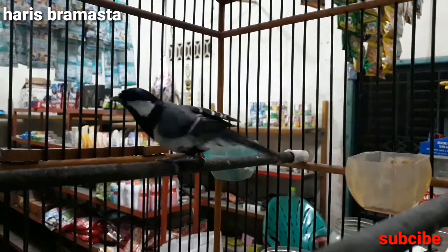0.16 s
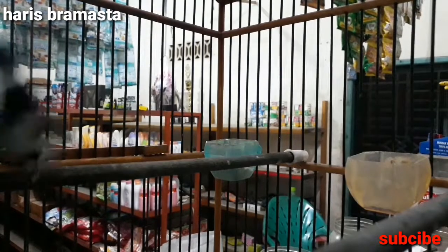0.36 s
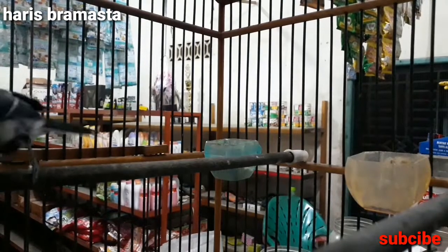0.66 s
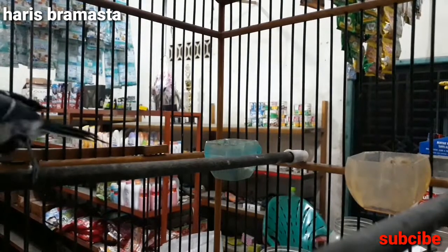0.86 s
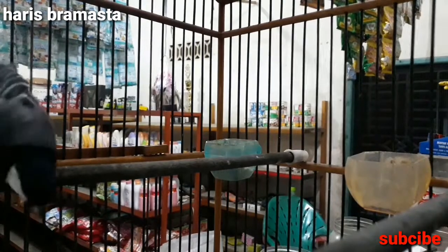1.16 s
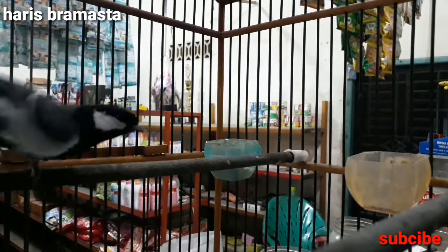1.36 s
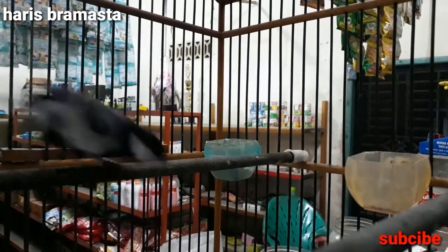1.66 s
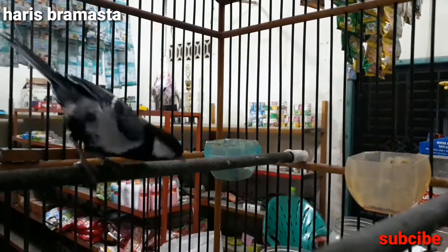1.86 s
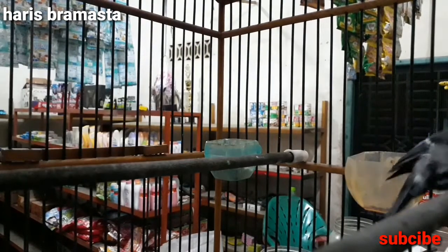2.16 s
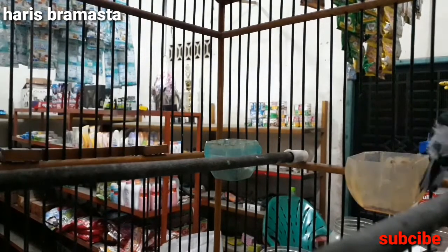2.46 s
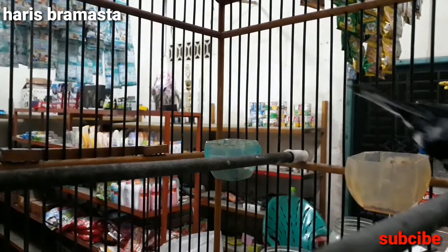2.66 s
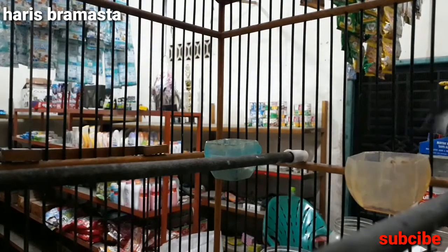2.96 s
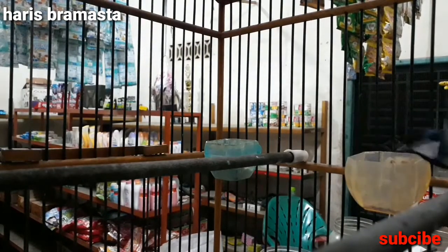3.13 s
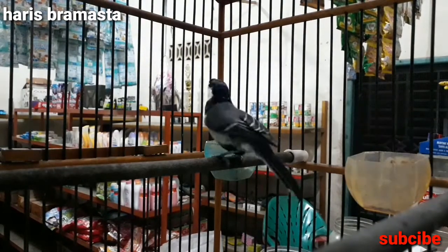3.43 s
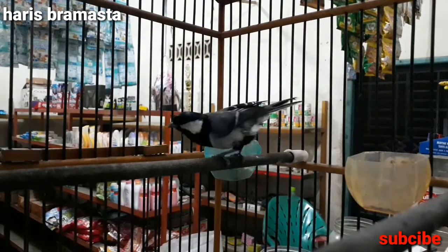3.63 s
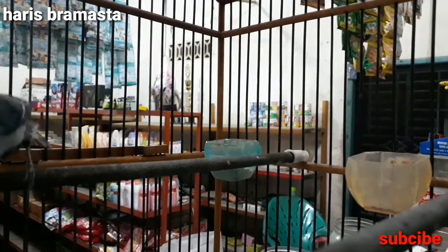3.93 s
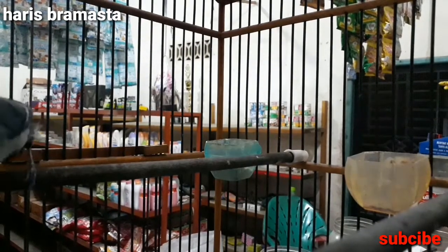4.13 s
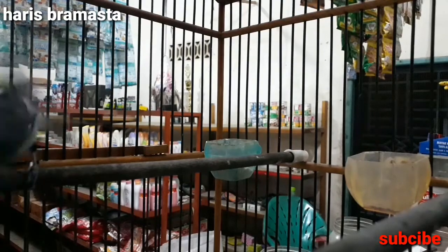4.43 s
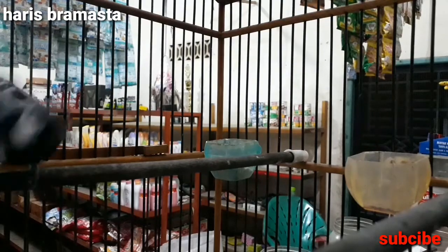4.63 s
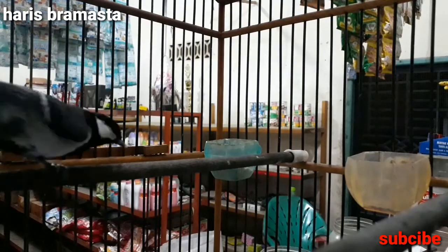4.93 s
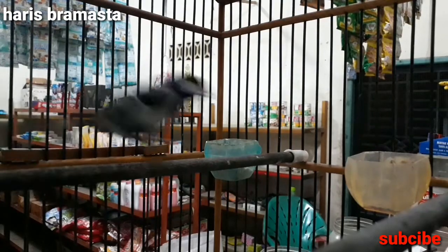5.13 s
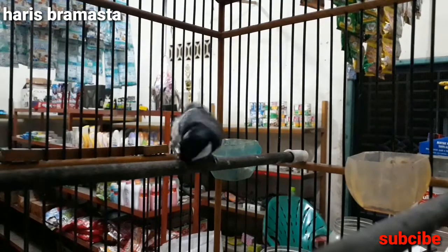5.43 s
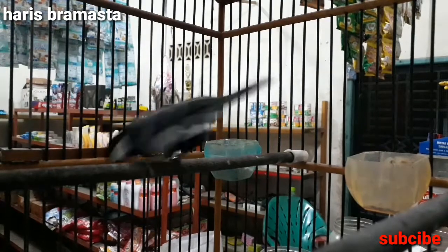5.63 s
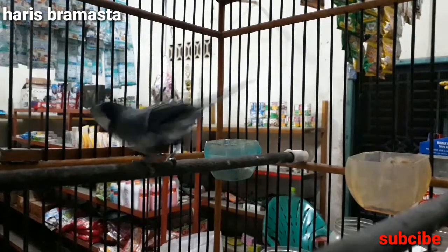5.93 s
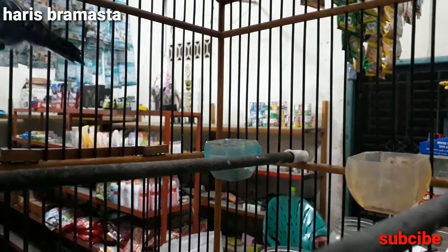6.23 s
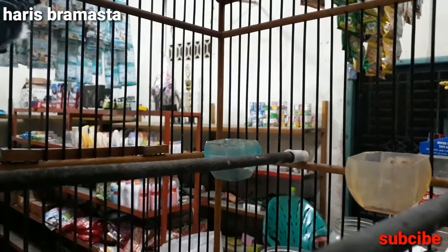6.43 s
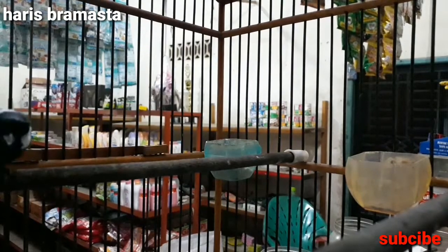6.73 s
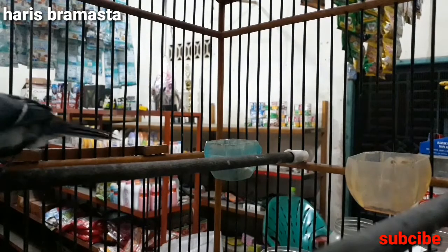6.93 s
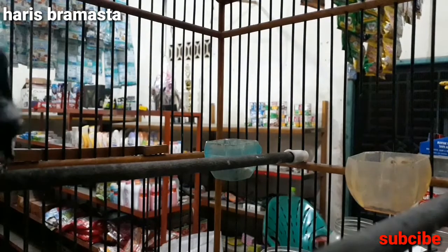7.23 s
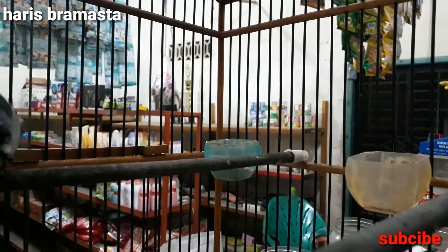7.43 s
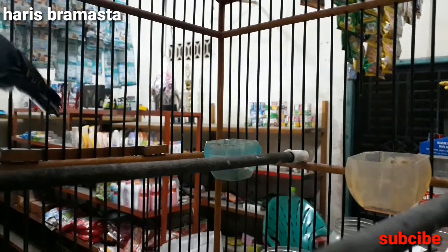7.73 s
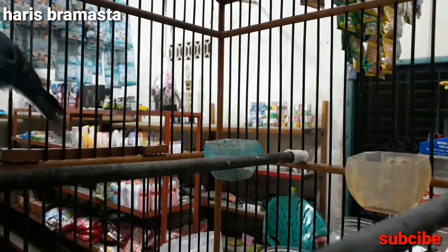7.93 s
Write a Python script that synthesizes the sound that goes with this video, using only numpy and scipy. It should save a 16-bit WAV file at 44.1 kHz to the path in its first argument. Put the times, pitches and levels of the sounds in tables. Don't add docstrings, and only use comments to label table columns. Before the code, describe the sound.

Caged birds whistle, seep and trill sharply in an echoing shop, claws knocking a wooden perch, while a vehicle drones nearer outside near the end.

```python
import sys
import numpy as np
from scipy import signal
from scipy.fft import rfft, irfft, next_fast_len
from scipy.io import wavfile
from scipy.ndimage import uniform_filter1d, map_coordinates

SR = 44100
rng = np.random.default_rng(int(sys.argv[2]) if len(sys.argv) > 2 else 0)


def file_out(sig):
    cols = np.atleast_2d(sig).T
    lim = np.clip(cols, -1, 1)
    pcm = np.round(lim * 32767).astype(np.int16)
    wavfile.write(sys.argv[1], SR, pcm)


def voltage_ratio(decibels):
    exponent = np.asarray(decibels, float) / 20
    return 10 ** exponent


N = 356769
TIME = np.arange(N) / SR

SONG_OVERTONES = [3.5, -33, -50, -45]


def unit(x):
    return x / np.sqrt(np.mean(x ** 2) + 1e-20)


def along(points, hz):
    f, v = np.transpose(points)
    return np.interp(np.log(hz + 1), np.log(f + 1), v)


def wobble(rate, count=N):
    knots = rng.standard_normal(int(count * rate / SR) + 4)
    return map_coordinates(knots, [np.arange(count) * rate / SR])


def filtered(x, response):
    m = next_fast_len(N + SR // 2)
    return irfft(rfft(x, m) * response(np.fft.rfftfreq(m, 1 / SR)), m)[:N]


def rush(spectrum, patchy_db):
    z = signal.stft(rng.standard_normal(N), nperseg=512)[2]
    over_frequency = uniform_filter1d(rng.standard_normal(z.shape), size=6, axis=0)
    field = uniform_filter1d(over_frequency, size=14, axis=1)
    patchy = signal.istft(z * voltage_ratio(patchy_db * unit(field)), nperseg=512)[1][:N]
    return unit(filtered(patchy, lambda hz: voltage_ratio(along(spectrum, hz))))


def add(track, rows, overtones_db, jitter, shimmer_db, fade):
    s, hz, db = np.transpose(rows)
    at = np.arange(max(round(s[0] * SR), 0), min(round(s[-1] * SR), N))
    t = at / SR
    pitch = np.interp(t, s, hz) * (1 + jitter * wobble(150.7, count=len(t)))
    phase = 2 * np.pi * np.cumsum(pitch) / SR
    edge = np.clip(np.minimum(t - s[0], s[-1] - t) / fade, 0, 1)
    tone = sum(voltage_ratio(level) * np.sin(k * phase) * (k * pitch < SR / 2)
               for k, level in enumerate(overtones_db, start=1))
    level_db = np.interp(t, s, db) + shimmer_db * wobble(120, count=len(t))
    track[at] += edge * voltage_ratio(level_db) * tone


def shop(x, liveness=1):
    # (frequency [Hz], time to fall 60 dB [s])
    decay_times = [(500, 0.29), (3000, 0.47), (8000, 0.35), (15000, .2)]
    hz, t, z = signal.stft(rng.standard_normal(SR * 3 // 4), SR, nperseg=256)
    decay_db = -60 * t / (liveness * along(decay_times, hz)[:, None])
    tail = signal.istft(z * voltage_ratio(decay_db), SR, nperseg=256)[1]
    delayed = np.pad(x, (round(.006 * SR), 0))
    return signal.fftconvolve(delayed, tail / np.linalg.norm(tail))[:N]


def orders(rate_hz, levels, flutter_db):
    turn = 2 * np.pi * np.cumsum(rate_hz * (1 + 0.0027 * wobble(2.7))) / SR
    return unit(sum(voltage_ratio(db + flutter_db * wobble(4.6)) * np.sin(k * turn + 0.44 * wobble(3.7))
                    for k, db in levels))


def street():
    # (time [s], firing rate [Hz], engine load [dB], nearness [dB])
    approach = [(0, 58.68, -72, -56), (1.1, 58.93, -64, -56), (1.9, 60.15, -72, -57),
                (2.85, 60.03, -59, -53.5), (3.6, 61, -64.5, -55), (4.4, 61.46, -61, -52),
                (5, 61.02, -63, -49), (5.6, 60.08, -52.5, -46), (6.2, 59.56, -42.5, -43.5),
                (6.85, 55.35, -42.5, -35.5), (7.299, 52.27, -37, -33.5), (7.7, 49.54, -36, -35.5),
                (7.9, 48, -46, -37.5), (8.09, 48.8, -45, -39)]
    firing_orders = [0.5, -5.5, -8.5, -8.5, -18.5, -11.5, -21, -21]
    # (time [s], shaft rate [Hz], level [dB])
    departure = [
        (0, 33.2, -56.5),
        (.6, 33.77, -56),
        (1.5, 35.2, -60.5),
        (1.9, 35.4, -63.5),
    ]
    # (multiple of the shaft rate, level [dB])
    departing_orders = [(2, -11), (4, -1.5), (5, -3), (6, -10), (7, -15.5)]
    # (time [s], pitch [Hz], level [dB])
    gear_whine = [(.15, 365.4, -67), (.35, 356.3, -55), (.65, 348.2, -61), (1, 338.7, -71),
                  (1.3, 314.3, -63.5), (1.701, 308, -65)]
    # (frequency [Hz], density [dB per Hz])
    near_road = [(18, -33), (30, -11), (54, -2.5), (152, -5), (217, -2.5), (263, -5), (434, -3.5),
                 (513, -3.5), (1400, -11.5), (1690, -13), (2050, -16), (3230, -20.5), (9000, -42.5),
                 (11700, -65), (19800, -120)]
    far_street = [(15, -65), (25, -45), (75, -5.5), (117, 1.5), (240, -16.5), (308, -8), (404, -10),
                  (436, -8), (493, -29.5), (602, -18), (1090, -18.5), (1270, -19.5), (2140, -25.5),
                  (3520, -30.5), (9500, -45.5), (12400, -85.5), (20900, -120)]
    tyre_hiss = [(4710, -38.5), (8000, -53), (9620, -6), (10400, 9), (11400, 9), (14900, 8.5), (15600, 9)]

    s, *columns = np.transpose(approach)
    firing_hz, drone_db, wash_db = [np.interp(TIME, s, c) for c in columns]
    drone = orders(firing_hz, enumerate(firing_orders, start=1), flutter_db=1.2)

    s, shaft_hz, db = np.transpose(departure)
    going = voltage_ratio(np.interp(TIME, s, db, right=-120))
    leaving = going * orders(np.interp(TIME, s, shaft_hz), departing_orders, flutter_db=2.5)

    near = np.clip((wash_db + 60.5) / 16, 0, 1)
    road = np.sqrt(near) * rush(near_road, patchy_db=0.5)
    road += np.sqrt(1 - near) * rush(far_street, patchy_db=1.0)
    road_db = wash_db + 1.5 + 0.27 * wobble(7.6)

    whine = np.zeros(N)
    add(whine, gear_whine, [3], jitter=0.0078, shimmer_db=-2.5, fade=0.017)

    closest_db = -33.5
    nearing_hiss = voltage_ratio(-61 + 0.85 * (wash_db - closest_db))
    tyres = np.hypot(nearing_hiss, going * voltage_ratio(-18.5))
    hiss = tyres * voltage_ratio(2.5 + 1.2 * wobble(1.9)) * rush(tyre_hiss, patchy_db=1.5)
    return voltage_ratio(drone_db + 2.0) * drone + leaving + voltage_ratio(road_db) * road + hiss + whine


def whirr():
    # (frequency [Hz], width [Hz], level [dB])
    tread_bands = [(396.4, 18, -8.5), (940, 65, -5.5), (1246, 60, -1), (1694, 64, -0.5)]
    # (time [s], level [dB])
    course = [
        (2.6, -68),
        (3.5, -65.5),
        (4.5, -58),
        (5.4, -60.5),
        (6, -82.5),
    ]
    bands = lambda f: sum(voltage_ratio(db) * 1j * f * w / (c * c - f * f + 1j * f * w) for c, w, db in tread_bands)
    level_db = np.interp(TIME, *np.transpose(course), left=-120, right=-120)
    return voltage_ratio(level_db) * unit(filtered(rng.standard_normal(N), bands))


def ticks():
    # (time [s], peak level [dB])
    snaps = [(1.585, -66), (1.7, -63.5), (2.157, -68.5), (5.982, -55.5)]
    out = np.zeros(N)
    t = np.arange(SR // 50) / SR
    for s, db in snaps:
        bright = np.diff(rng.standard_normal(len(t) + 2), n=2)
        out[round(s * SR):][:len(t)] += voltage_ratio(db - 60 * t / .008) * bright
    return out


def perch():
    # (time [s], peak level [dB], middle mode [dB])
    knocks = [(0.105, -39, -13), (0.413, -45.5, 7), (1.165, -39.5, 3), (1.934, -47.5, -18),
              (2.126, -32, 1.5), (3.892, -41.5, -9)]
    # (frequency [Hz], width [Hz], level [dB])
    rod_modes = [(504, 50, -3), (700, 96, 1), (935, 51, -2.5), (1390, 76, -1.5)]
    out = np.zeros(N)
    t = np.arange(SR // 8) / SR
    for s, db, middle_db in knocks:
        ring = np.zeros(len(t))
        for hz, width, level in rod_modes:
            mode_db = level + (middle_db if 800 < hz < 1100 else 0)
            ring += voltage_ratio(mode_db) * np.exp(-np.pi * width * t) * np.sin(2 * np.pi * hz * t)
        soft_contact = 1 - np.exp(-t / 0.00091)
        out[round(s * SR):][:len(t)] += voltage_ratio(db - 5) * ring * soft_contact
    return out + voltage_ratio(-9) * shop(out)


def glides(calls, attack, release, onset_db, end_db, bend, linger=0):
    u = np.linspace(0, 1, num=17)
    shape_db = onset_db * np.clip(1 - u / attack, 0, 1) + end_db * np.clip(1 - (1 - u) / release, 0, 1)
    slide = u ** bend + linger * np.sin(2 * np.pi * u) / (2 * np.pi)
    return [np.transpose([s + length * u, a + (b - a) * slide, db + shape_db]) for s, length, a, b, db in calls]


def far_bird(notes, overtones_db, jitter, direct_db, echo_db, hoarse=0):
    out = np.zeros(N)
    for rows in notes:
        note = np.zeros(N)
        add(note, rows, overtones_db, jitter, shimmer_db=3.5, fade=0.0035)
        beaten = note * voltage_ratio(2.6 * wobble(32))
        beaten *= np.linalg.norm(note) / np.linalg.norm(beaten)
        note = beaten * (1 + hoarse * wobble(1300))
        out += voltage_ratio(direct_db) * note + voltage_ratio(echo_db) * shop(note)
    return out


def faint_whistles():
    # (time [s], length [s], from [Hz], to [Hz], level [dB])
    whistles = [(3.44, 0.13, 3820, 3790, -75), (3.81, 0.1, 3800, 3750, -70),
                (4.1, 0.057, 4080, 4180, -73.5), (4.17, 0.15, 4200, 4250, -62),
                (4.5, .09, 4060, 4200, -63.5), (4.59, .09, 4280, 4560, -60),
                (4.69, 0.097, 4330, 4240, -53.5), (4.87, 0.197, 4250, 4310, -67.5),
                (5.08, .12, 4420, 4185, -57.5), (5.2, 0.12, 4230, 4530, -54.5),
                (5.45, .45, 4400, 4380, -67)]
    sweeps = [(2.118, 0.023, 3600, 6800, -62.5), (2.148, .05, 6800, 6950, -68),
              (7.708, .045, 5250, 5170, -59)]
    notes = glides(whistles + sweeps, .3, 0.15, onset_db=-3.5, end_db=-8, bend=.9)
    return far_bird(notes, [0], jitter=0.011, direct_db=-0.5, echo_db=0, hoarse=.15)


def seeps():
    # (time [s], length [s], from [Hz], to [Hz], level [dB])
    thin_calls = [(.512, 0.1, 7520, 7120, -45), (.8, 0.12, 7520, 7070, -48),
                  (1.135, 0.098, 7550, 7030, -50), (6.6, .085, 7580, 7240, -52)]
    notes = glides(thin_calls, .35, .3, onset_db=-14, end_db=-12, bend=1.0, linger=.8)
    return far_bird(notes, [0, -24], jitter=0.0087, direct_db=1.0, echo_db=-12.0)


def buzz():
    # (time [s], length [s], from [Hz], to [Hz], level [dB])
    buzzy_calls = [
        (.665, .055, 3500, 4310, -49),
        (.71, .06, 4210, 3700, -43),
    ]
    notes = glides(buzzy_calls, .45, 0.22, onset_db=-12.5, end_db=-4, bend=.95)
    return far_bird(notes, SONG_OVERTONES, jitter=.028, direct_db=-1.0, echo_db=2.5, hoarse=.24)


def low_whistles():
    # (time [s], length [s], from [Hz], to [Hz], level [dB])
    low_calls = [(5.03, 0.078, 2410, 1840, -50.5), (5.075, 0.18, 1870, 1672, -42),
                 (5.345, .1, 2124, 1985, -40), (5.42, 0.14, 2030, 1614, -36),
                 (5.665, 0.16, 2022, 1626, -39.5), (5.78, 0.075, 1643, 1817, -36),
                 (5.85, 0.11, 1780, 1823, -39)]
    notes = glides(low_calls, 0.33, .25, onset_db=-8.5, end_db=-7, bend=.75)
    return far_bird(notes, [0, -30], jitter=0.012, direct_db=-0.5, echo_db=-1.5, hoarse=0.047)


def song():
    # (time [s], length [s], from [Hz], to [Hz], level [dB])
    whistles = [(0, 0.026, 4100, 4040, -33), (.03, .1, 4020, 4083, -50), (0, 0.029, 1674, 1676, -48.5),
                (.045, 0.1, 1960, 2080, -41), (.12, 0.19, 2000, 2161, -41.5),
                (.185, 0.098, 2803, 2610, -39.5), (.275, 0.082, 2642, 2960, -39),
                (.31, 0.051, 3210, 3140, -43.5), (.43, 0.062, 2760, 2860, -42),
                (.515, 0.059, 2830, 2900, -37.5), (.575, 0.078, 3070, 2820, -49.5),
                (.745, 0.17, 3547, 3416, -43.5), (.89, 0.138, 3548, 3607, -43),
                (5.986, 0.056, 2200, 2417, -36), (6.035, 0.051, 2430, 2830, -39),
                (6.06, 0.044, 2380, 2365, -48)]
    slurs = [(.235, 0.053, 2193, 2900, -46), (.325, 0.029, 3150, 3600, -53.5),
             (.472, 0.057, 2830, 2240, -47.5), (.575, .02, 3050, 3670, -63), (1.02, .05, 3540, 3110, -50)]
    rising = [
        (4.21, .06, 2250, 2070, -61),
        (4.27, .14, 2130, 2280, -45.5),
        (4.41, 0.131, 2303, 2404, -45),
        (4.54, .29, 2448, 2637, -41),
    ]
    notes = glides(whistles, 0.13, 0.35, onset_db=-7.5, end_db=-15, bend=0.902)
    notes += glides(slurs, .2, .3, onset_db=7, end_db=-3, bend=0.55)
    out = far_bird(notes, SONG_OVERTONES, jitter=0.0072, direct_db=0.5, echo_db=-2.0, hoarse=0.068)
    notes = glides(rising, 0.29, 0.29, onset_db=-9, end_db=-9.5, bend=.85)
    return out + far_bird(notes, [3.5, -44], jitter=0.0049, direct_db=1.2, echo_db=0.3, hoarse=0.055)


def chips():
    # (time [s], hold [s], top pitch [Hz], level [dB], hoarseness [0-1])
    upsweeps = [
        (3.607, 0.0063, 2771, -58.5, .91),
        (4.256, 0.015, 2731, -44, 0.6),
        (5.281, .007, 2852, -56.5, 0.9),
        (7.16, .026, 2630, -44.5, 0.7),
    ]
    # (frequency [Hz], gain [dB])
    throat = [(1500, -31), (2700, -10), (3400, -18), (4400, 3), (5400, 6), (7000, -5.5), (8200, -18),
              (11000, -22), (15000, -18)]
    calls = np.zeros(N)
    rise = .045
    partials_db = [4.0, -0.5, -10.5, -5, -7, -8, -8.5]
    for s, hold, top_hz, db, hoarse in upsweeps:
        rows = [(s, .55 * top_hz, db - 3.5), (s + 0.52 * rise, 0.64 * top_hz, db + .4),
                (s + 0.73 * rise, .9 * top_hz, db - 2.5), (s + rise, top_hz, db - 1)]
        clear_db = db + 16 - 22 * hoarse
        top = [(s + .85 * rise, .94 * top_hz, clear_db - 6), (s + rise, top_hz, clear_db),
               (s + rise + hold, top_hz, clear_db - 3.5)]
        calls += far_bird([rows], partials_db, jitter=0.016, direct_db=1.0, echo_db=4.0, hoarse=hoarse)
        calls += far_bird([top], partials_db, jitter=.008, direct_db=0.8, echo_db=-2.5, hoarse=.3 * hoarse)
    return filtered(calls, lambda f: voltage_ratio(along(throat, f)))


def trill():
    # (time [s], pitch [Hz], level shape [dB])
    note_shape = [(-.0421, 1986, -17.5), (-.0351, 2393, -4), (-.0191, 3153, -4), (-.0061, 3531, 1),
                  (.0011, 3993, -8.5), (0.011, 2605, 2.4), (0.0262, 2975, 1), (.0501, 3010, -2.5),
                  (0.0536, 2991, -34.5)]
    effort_times = [
        -.02,
        -.003,
        .015,
        .042,
    ]
    # (time of the highest point [s], effort in rise [dB], at top [dB], early in hold [dB], late in hold [dB])
    trill_notes = [(2.4553, -13, -11.5, -12.5, -11.5), (2.6016, -9.5, -9.5, -14.5, -12.2),
                   (2.7481, -12.2, -9, -14.5, -23.5), (2.8984, -16.5, -15.5, -13.2, -22),
                   (3.04, -14.2, -12.5, -14.5, -13.5), (7.98, -21.5, -13.5, -17, -23)]
    overtones = [-1.5, -36, -41.5, -56.5, -56, -61.5]
    beak_facing = [2.5, 0.5, 0.6, -1, 0, -4.5]
    # (frequency [Hz], gain [dB])
    tract = [(1800, -23), (2300, -17.5), (2800, -2), (3700, 2), (4100, 2), (4500, 10), (5500, -3),
             (8000, -11.5), (11500, 4), (15000, 1.5)]
    # (delay [s], level [dB])
    reflections = [(.0021, -16), (.0047, -16), (.0135, -17), (.021, -21)]

    out = np.zeros(N)
    s, hz, shape_db = np.transpose(note_shape)
    for (top, *effort_db), facing_db in zip(trill_notes, beak_facing):
        note = np.zeros(N)
        partials_db = overtones[:1] + [db + facing_db for db in overtones[1:]]
        level_db = shape_db + np.interp(s, effort_times, effort_db)
        add(note, np.transpose([top + s, hz, level_db]), partials_db, jitter=0.005, shimmer_db=0.75, fade=0.0016)
        out += note + voltage_ratio(-17.5 - .6 * facing_db) * shop(note, liveness=0.69)
    walls = lambda f: 1 + sum(voltage_ratio(db) * np.exp(-2j * np.pi * f * lag) for lag, db in reflections)
    return filtered(out, lambda f: voltage_ratio(along(tract, f)) * walls(f))


def scene():
    outside = street() + whirr()
    fittings = ticks() + perch()
    far_birds = faint_whistles() + seeps() + buzz() + low_whistles() + song() + chips()
    return (outside + fittings + far_birds + trill())[None]


def low_pass(x):
    return signal.sosfilt(signal.butter(12, 16640, fs=SR, output="sos"), x)


def record(dry):
    band = lambda hz: (hz < 15500) * hz ** 2 / (hz ** 2 + 38 ** 2)
    mix = filtered(dry[0], band)[None]
    return low_pass(mix)


dry = scene()
out = record(dry)
file_out(out)
```